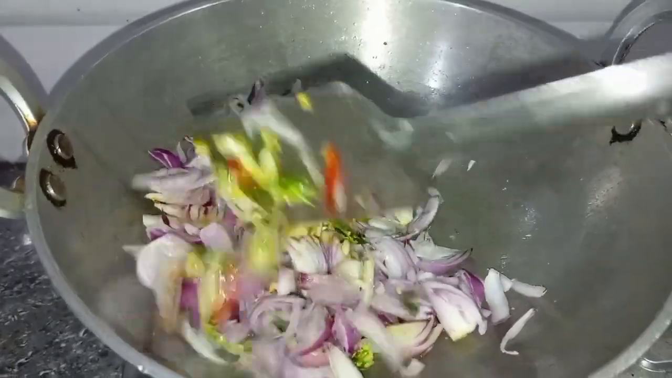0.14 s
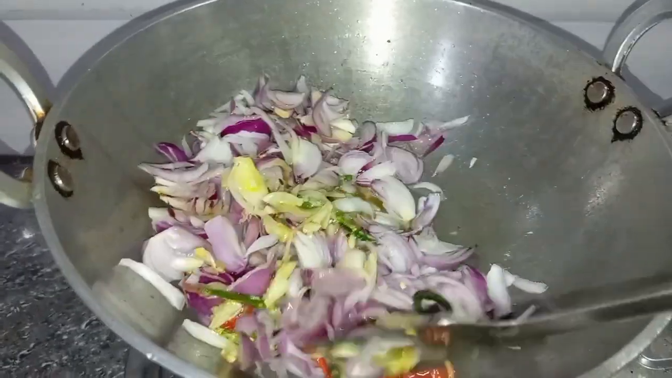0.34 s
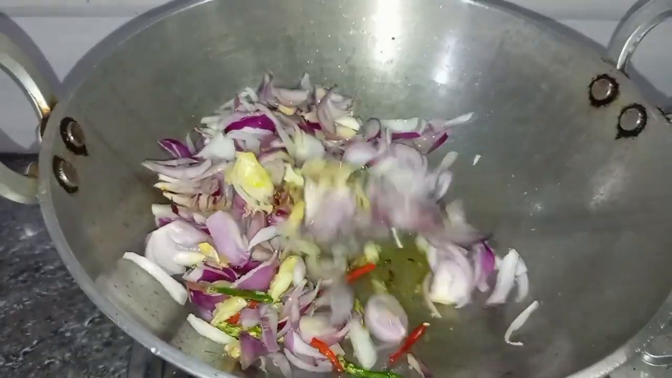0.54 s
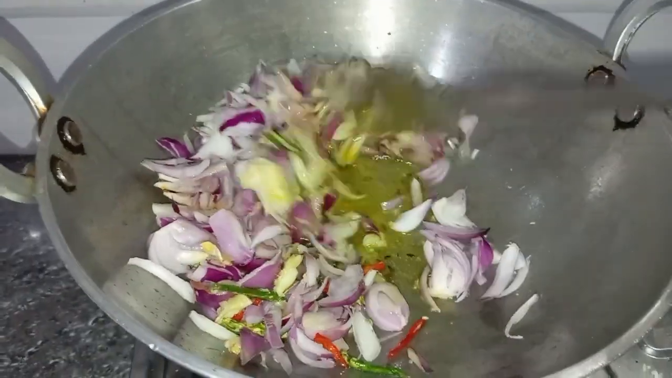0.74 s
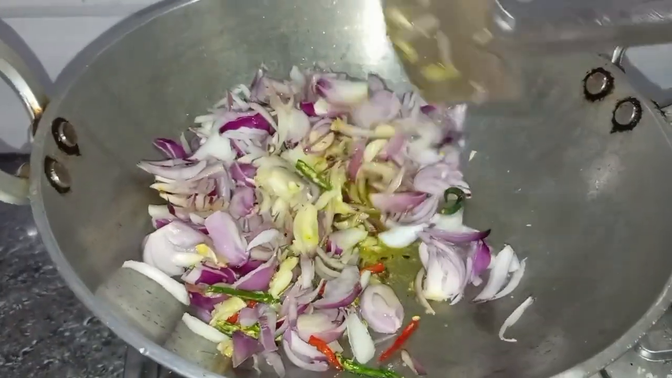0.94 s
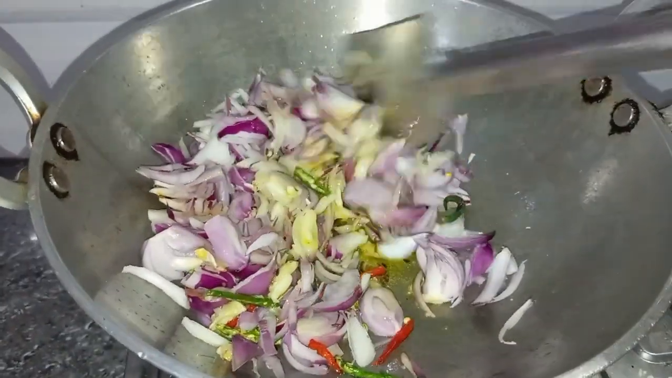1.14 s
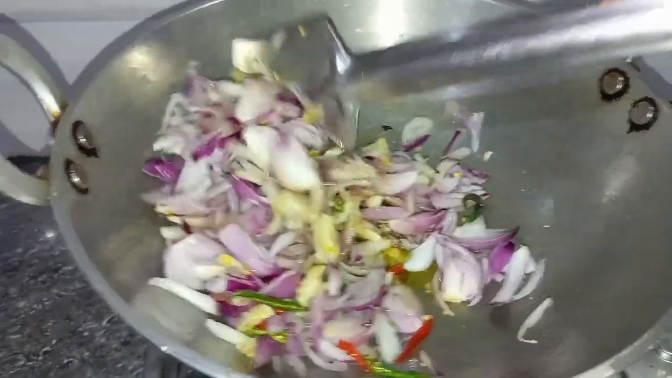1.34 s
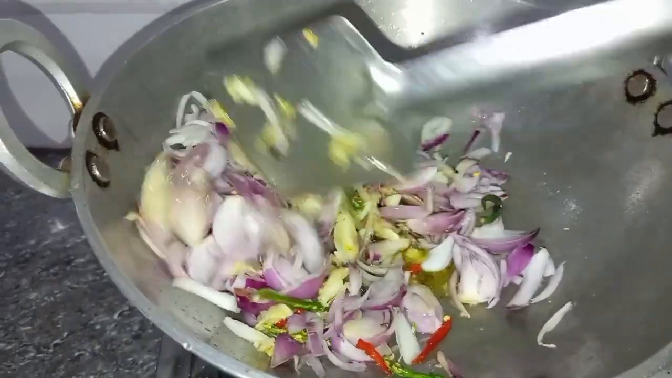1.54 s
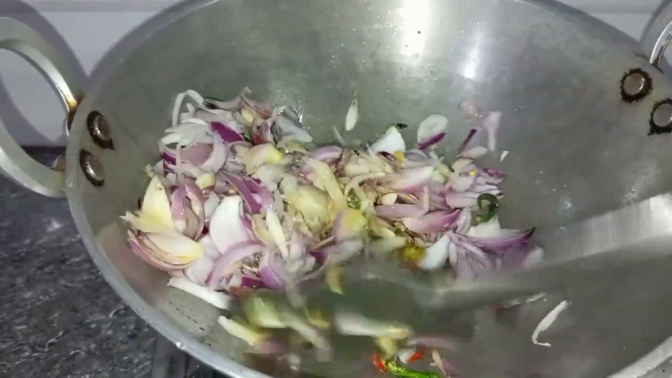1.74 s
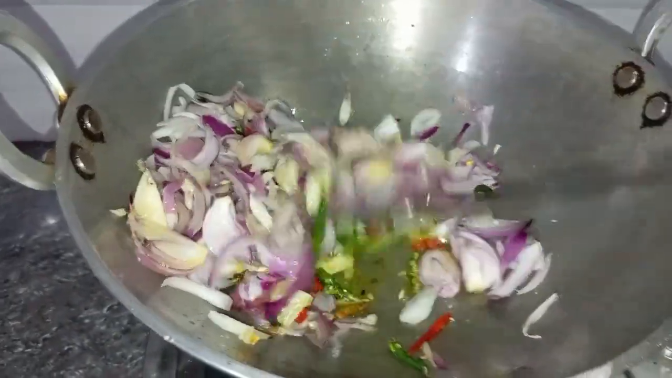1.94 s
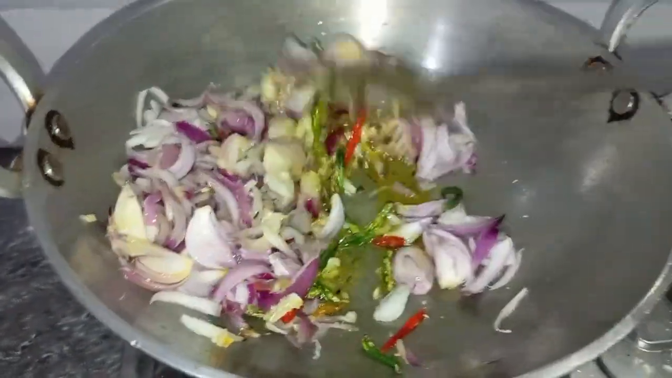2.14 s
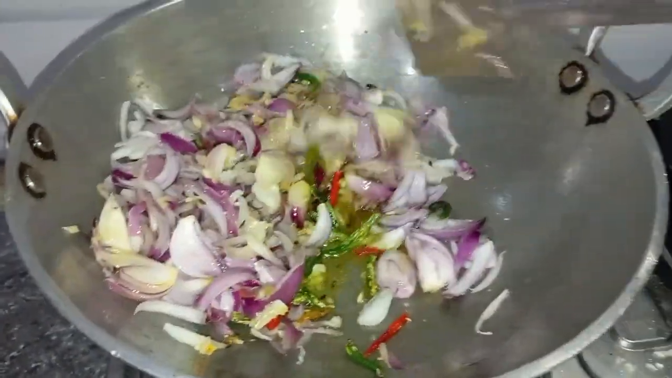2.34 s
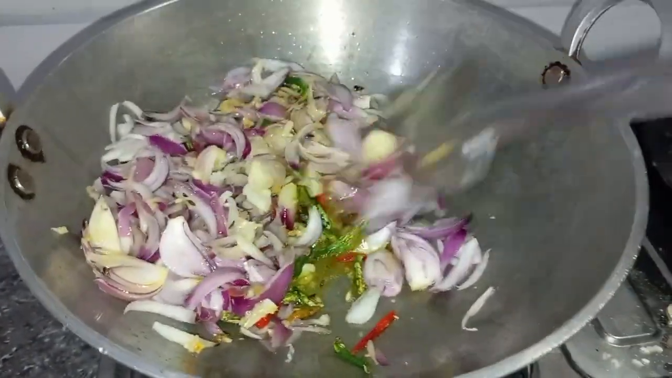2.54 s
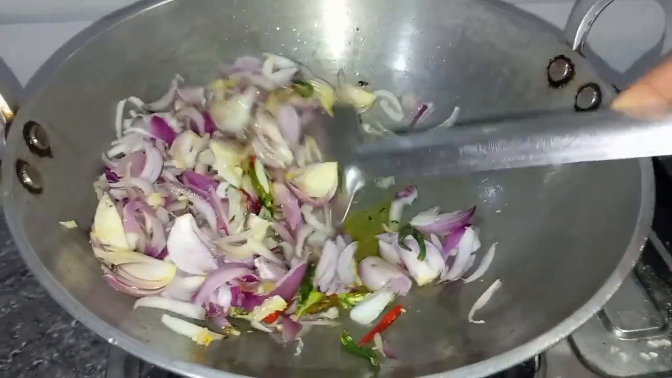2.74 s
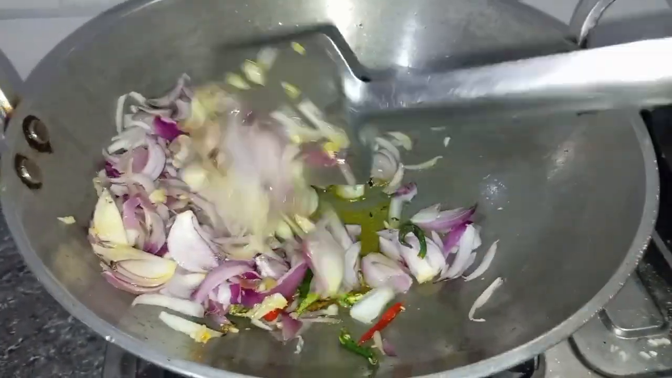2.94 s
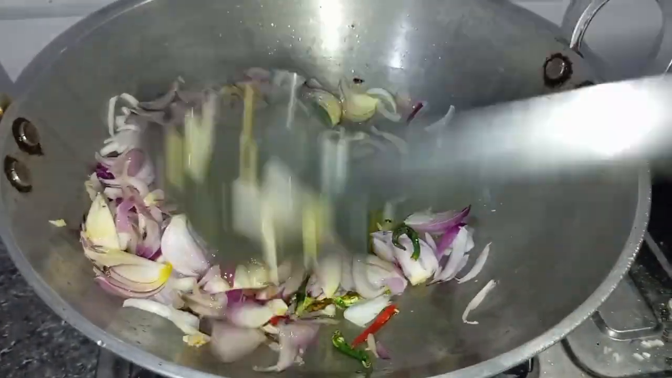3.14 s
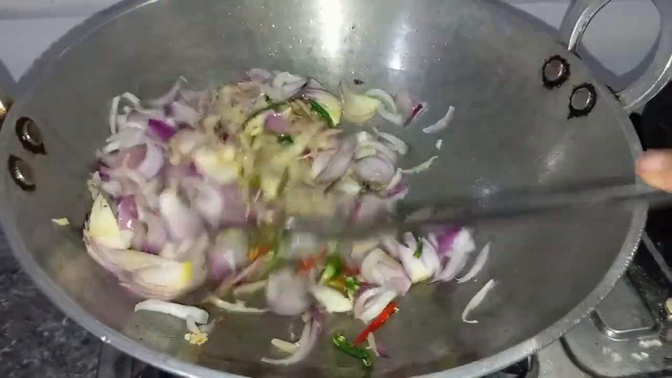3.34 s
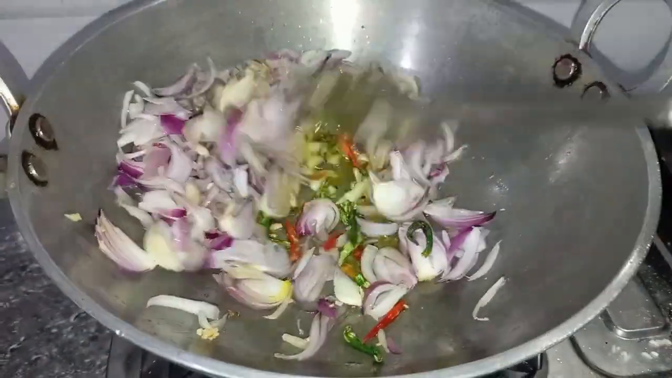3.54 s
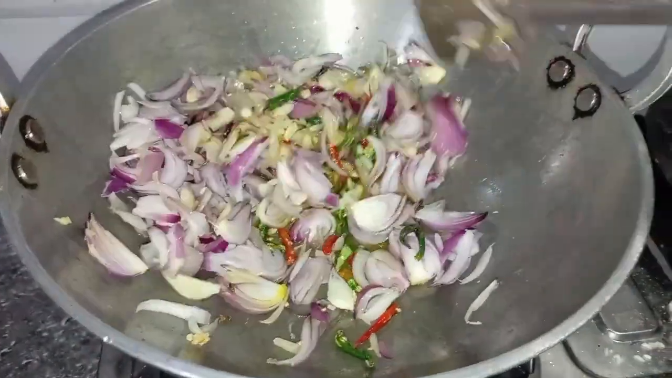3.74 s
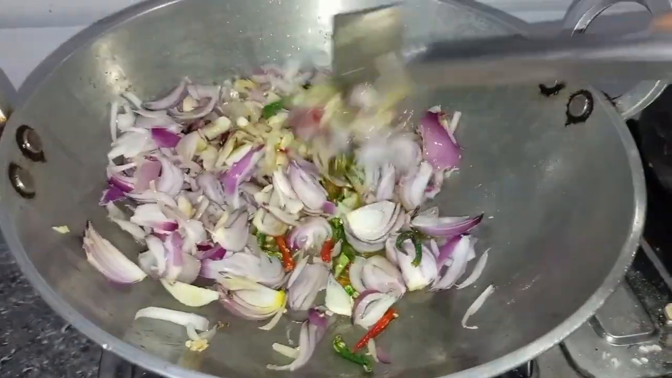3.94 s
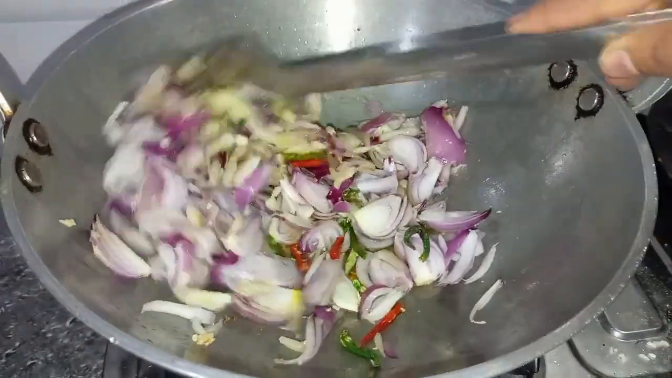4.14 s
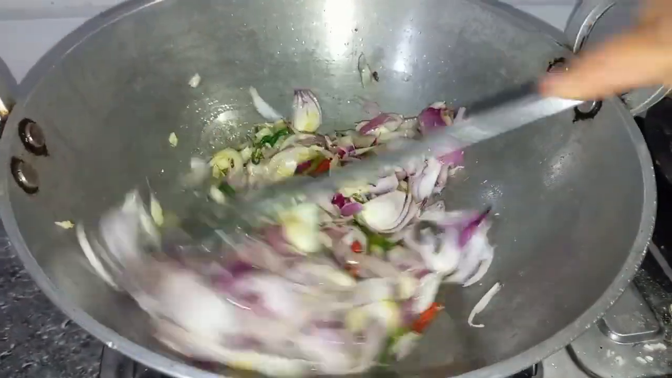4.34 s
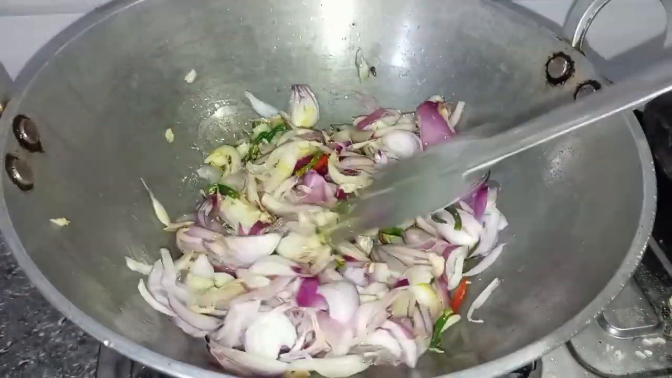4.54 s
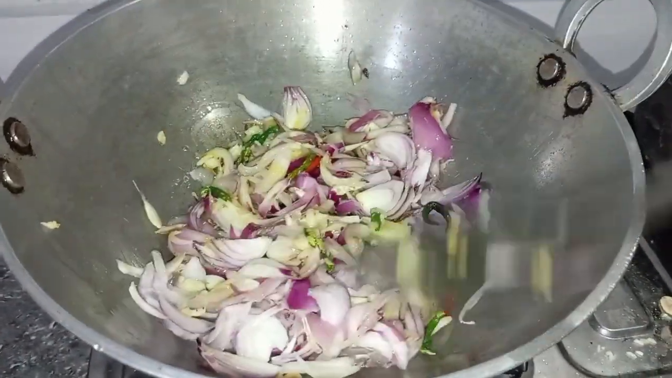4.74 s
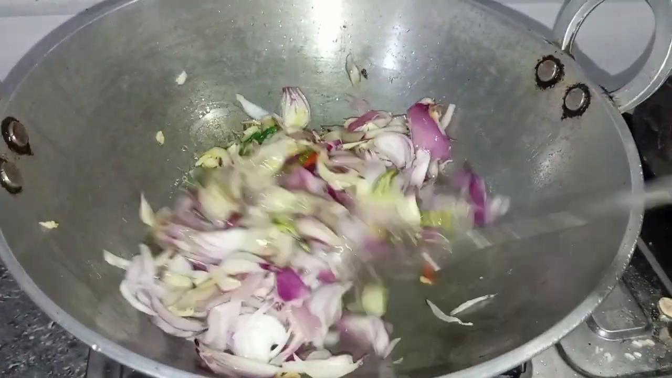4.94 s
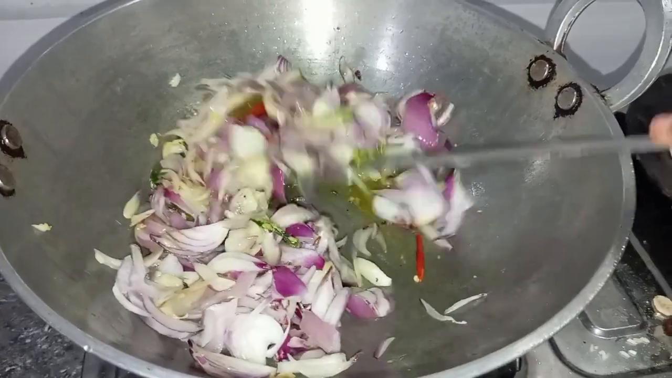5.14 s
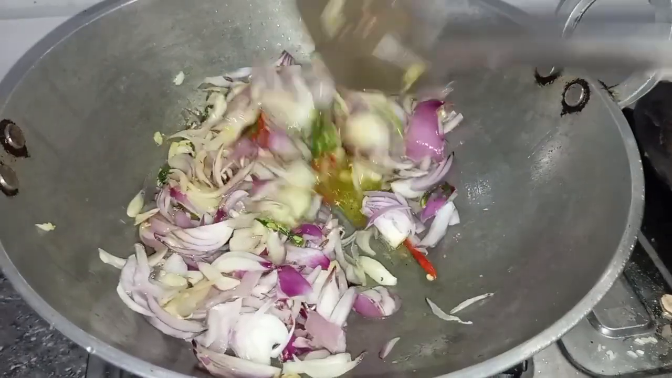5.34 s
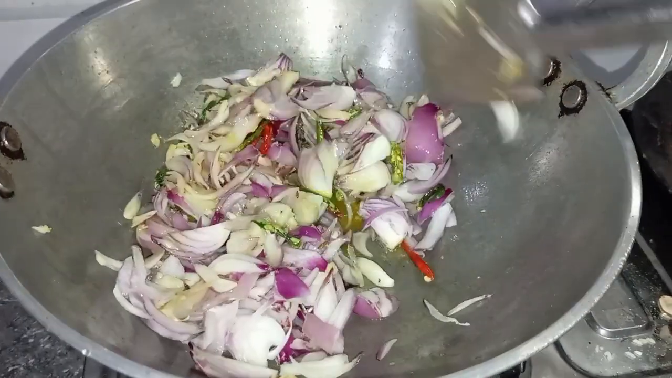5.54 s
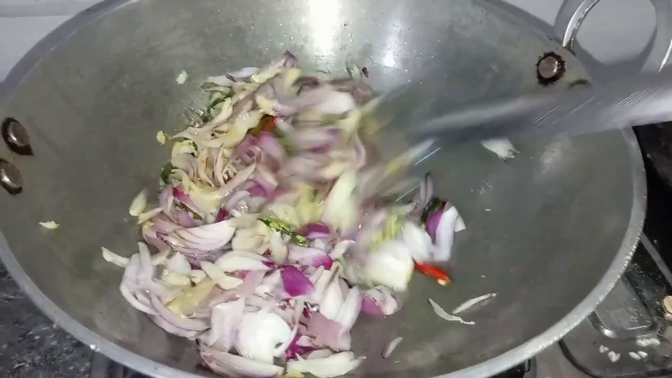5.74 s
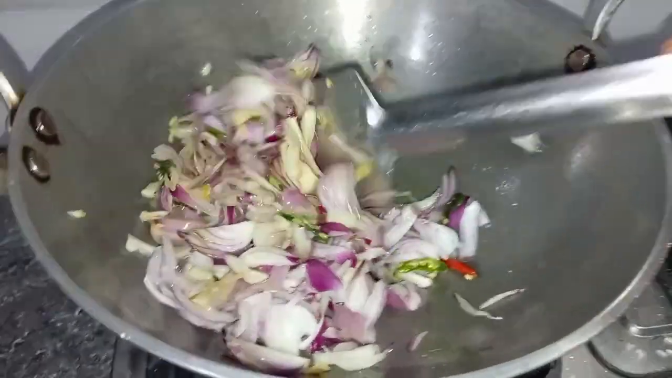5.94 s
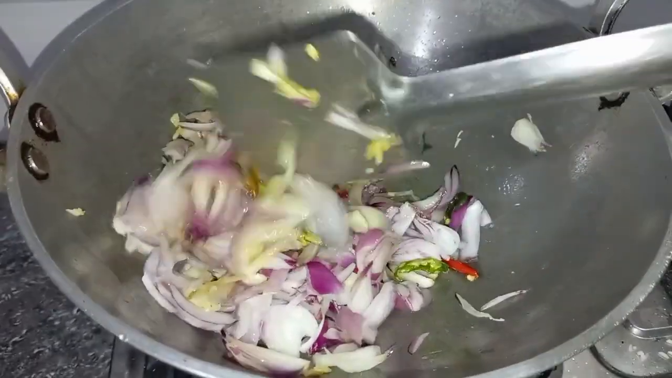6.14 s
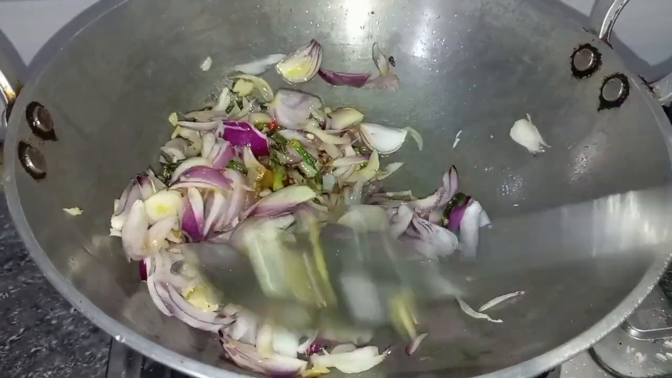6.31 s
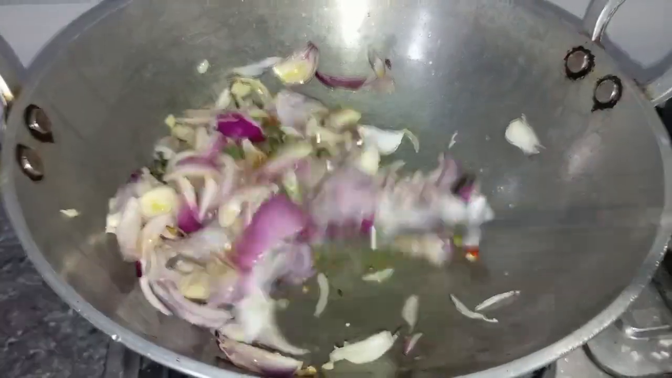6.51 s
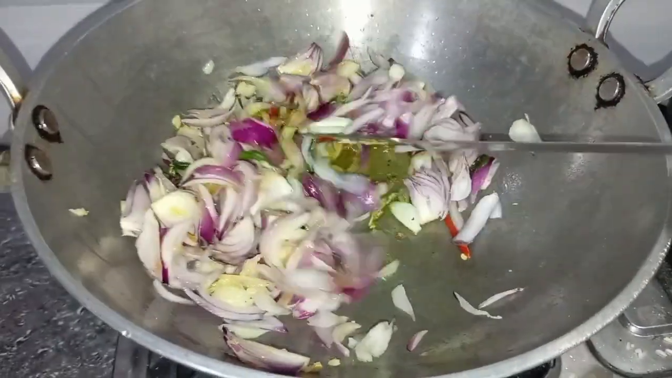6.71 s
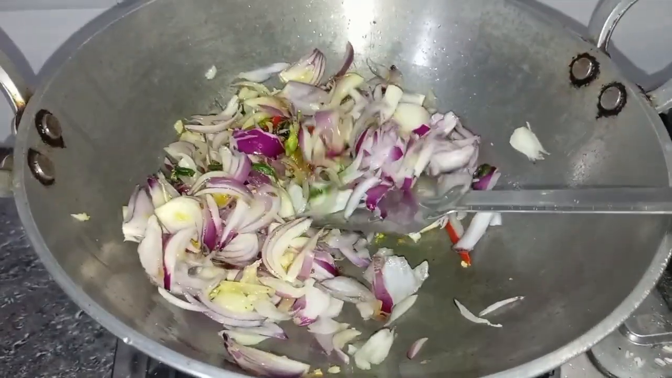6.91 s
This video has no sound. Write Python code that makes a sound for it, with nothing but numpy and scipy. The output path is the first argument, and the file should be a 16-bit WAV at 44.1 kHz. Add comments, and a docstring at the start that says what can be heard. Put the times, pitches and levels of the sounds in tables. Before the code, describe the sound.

Onions sizzle brightly in hot oil while a metal spatula lands in the pan with sharp clanks and gritty scrapes, amid snapping oil pops.

```python
"""Sliced onions sizzle in oil in a deep metal pan, close to a mono microphone in a quiet kitchen.
From the start, water bursts as dense grains of filtered noise, with sparse tinkling; pops are ringing clicks.
After a third of a second a metal spatula makes the first of nine landings, each followed by a scrape:
blows and gritty noise excite shared modes of blade and pan. Short crackles of spiky ringing noise come
from the pan; from two seconds on there are soft low thumps, one longer low hum and three stick-slip squeals."""
import sys
import numpy as np
from scipy import signal
from scipy.fft import rfft, irfft
from scipy.io import wavfile
from scipy.ndimage import uniform_filter1d, minimum_filter1d

SR = 44100
rng = np.random.default_rng(int(sys.argv[2]) if len(sys.argv) > 2 else 0)


def to_wav(sig):
    """Store sig (one row per channel, or 1-D mono) as 16-bit WAV at the path in sys.argv[1].

    Samples outside -1..1 are clipped; the rate is SR.
    """
    pcm = np.clip(np.atleast_2d(sig), -1, 1) * 32767
    pcm = np.round(pcm).astype(np.int16)
    wavfile.write(sys.argv[1], SR, pcm.T)  # frames by channels


def invert_db(level):
    """Linear amplitude ratio for a level in decibels (20 dB per decade), elementwise."""
    return 10 ** (np.asarray(level, dtype=float) / 20)


N = 311919   # samples


def rms_one(x):
    """Normalisation: scales the signal to rms 1."""
    return x / np.sqrt(np.mean(x ** 2) + 1e-20)


def in_time(rows, outside=None):
    """Linear interpolation: joins table rows by straight lines, one array per column after the time."""
    s, *columns = np.transpose(rows)
    t = np.arange(N) / SR
    return np.array([np.interp(t, s, column, left=outside, right=outside) for column in columns])


def colour(x, spectrum, size=4096):
    """Minimum-phase filtering: the folded cepstrum gives a causal filter of this spectrum; rms 1 out."""
    hz, db = np.transpose(spectrum)
    grid = np.maximum(np.arange(size // 2 + 1), 0.1) * SR / size
    log_gain = np.interp(np.log(grid), np.log(hz), db) * np.log(10) / 20
    cepstrum = irfft(log_gain)
    cepstrum[1:size // 2] *= 2
    cepstrum[size // 2 + 1:] = 0
    response = irfft(np.exp(rfft(cepstrum)))
    return rms_one(signal.oaconvolve(x, response)[:N])


def high_pass(x, hz):
    """Fourth-order Butterworth low cut."""
    return signal.sosfilt(signal.butter(4, hz, "high", fs=SR, output="sos"), x)


def drift(rate):
    """Low-passed noise: a random wander of rms 1 through a double pole at rate [Hz], every 40th sample."""
    r = np.exp(-80 * np.pi * rate / SR)
    white = rng.standard_normal(N // 40 + 2002)
    slow = signal.lfilter([1], [1, -2 * r, r * r], white)[2000:]
    return np.interp(np.arange(N) / 40, np.arange(len(slow)), rms_one(slow))


def ring(force, hz, t60):
    """Damped resonator: a unit click starts a cosine of height 1; zeros block the spectrum's two ends."""
    r, w = invert_db(-60 / (t60 * SR)), 2 * np.pi * hz / SR
    return signal.lfilter([0.5, 0, -0.5], [1, -2 * r * np.cos(w), r * r], force + 1e-18)


def grains(per_s, spread_db, clump_db):
    """Poisson-like impulses: random clicks of uneven size and sign, in clumps as their rate wanders."""
    sizes = invert_db(spread_db * np.minimum(rng.exponential(1, N), 6)) * rng.choice([-1, 1], N)
    chance = per_s * invert_db(clump_db * drift(15.0)) / SR
    return sizes * (rng.random(N) < chance)


def dying(at, heights, t60):
    """Exponential decay: jumps at the given samples that die away."""
    envelope = np.zeros(N)
    envelope[at] = heights
    return signal.lfilter([1], [1, -invert_db(-60 / (t60 * SR))], envelope + 1e-18)


def swell(s, length, attack_s, release_s):
    """Exponential growth and decay: rises 30 dB into s, holds for length and falls 30 dB a release."""
    t = np.arange(N) / SR - s
    slopes = np.minimum(t / attack_s, (length - t) / release_s)
    return invert_db(np.maximum(30 * np.minimum(slopes, 0), -200))


def ringing_swells(rows, attack_s, release_s, cycles):
    """Narrow-band noise: each row swells at one pitch, with cycles of ringing per 60 dB of decay."""
    noise = rng.standard_normal((len(rows), N))
    out = 0
    for (s, length, hz, db), white in zip(rows, noise):
        tone = rms_one(ring(white, hz, cycles / hz))
        out = out + invert_db(db) * swell(s, length, attack_s, release_s) * tone
    return out


# spectrum of the room's noise: (frequency [Hz], relative density [dB])
ROOM_SPECTRUM = [(35, -66), (60, -5), (97, -5.5), (260, -7), (410, 2), (526, -7.5), (829, 5.5), (946, -3.5),
                 (1210, 3.5), (2000, -9), (2600, -66), (4400, -120)]


def room():
    """Stationary noise with a slight wander in level: the quiet kitchen's coloured noise floor."""
    level = invert_db(-60.5 + 1.25 * drift(6.3))
    return level * colour(rng.standard_normal(N), ROOM_SPECTRUM)


# spectrum of the low rumble: (frequency [Hz], relative density [dB])
RUMBLE_SPECTRUM = [(26, -53), (48, -50), (72, -8), (105, 4.5), (135, -15), (215, 0.5), (310, -22.5)]
# the pan rocks on its ring: (time [s], length [s], level before the wander [dB])
ROCKS = [(1.027, 0.1, -55), (1.783, 0.085, -54.5), (2.34, 0.24, -50.5), (4.804, 0.11, -54),
         (5.028, 0.049, -57.5), (6.566, 0.035, -62)]


def rumble():
    """Amplitude modulation: a faint low noise swells whenever the pan rocks."""
    level = invert_db(-72.5)
    for s, length, db in ROCKS:
        level = level + invert_db(db) * swell(s, length, attack_s=0.012, release_s=0.034)
    return level * invert_db(0.48 * drift(22.0)) * colour(rng.standard_normal(N), RUMBLE_SPECTRUM)


def tinkle(level_db):
    """Lightly damped resonance: random tinkling of sparse small clinks, each click at one of 24 pitches."""
    clicks = grains(per_s=100, spread_db=4.7, clump_db=4.0)
    dealt = rng.integers(0, 24, N)
    rings = 0
    for k, hz in enumerate(np.geomspace(2300, 7000, 24)):
        rings = rings + ring(clicks * (dealt == k), hz, 120 / hz)   # 120 cycles to fall 60 dB
    return invert_db(level_db - 17.5) * rms_one(rings)


def spit():
    """Sparse impulse noise: scattered droplets burst over a wide band."""
    clicks = grains(per_s=110, spread_db=2.3, clump_db=4.2)
    bright = colour(clicks, FIZZ_SPECTRUM)
    low = colour(clicks, BUBBLING_SPECTRUM)
    top = rms_one(high_pass(clicks, 10500.0))
    return invert_db(-59) * rms_one(bright + 0.29 * low + 0.45 * top)


# frying levels before the wander: (time [s], fine fizz [dB], coarse bubbling [dB])
FRYING_LEVELS = [(0.0, -46, -45.5), (1.02, -43, -47), (1.26, -45.5, -49.5), (1.75, -47, -52.5),
                 (1.95, -45.5, -44.5), (3.21, -44, -47), (3.48, -44, -43.5), (4.19, -42, -47),
                 (4.71, -46.5, -50.5), (4.92, -45, -45.5), (5.61, -43, -46.5), (6.32, -45.5, -48),
                 (6.48, -43.5, -41.5), (7.07, -45, -50)]
# spectrum of the fine bursts: (frequency [Hz], relative density [dB])
FIZZ_SPECTRUM = [(1180, -71), (2000, -23), (3190, 1), (3650, -31), (5010, 10), (5470, 14.5), (6950, 17),
                 (8740, 14), (10400, 10.5), (11200, -1.5), (13400, -25.5), (15300, 5.5), (16100, 19),
                 (16500, -66)]
# spectrum of the coarse bursts: (frequency [Hz], relative density [dB])
BUBBLING_SPECTRUM = [(520, -32), (950, -25), (1550, -1.5), (2400, -1), (3400, 4.5), (4800, 3.5), (7500, -9)]


def frying():
    """Shot noise: tiny steam bubbles burst as bright fizz, larger ones bubble lower in the spectrum."""
    fizz_db, bubbling_db = in_time(FRYING_LEVELS)
    hiss = 0.61 * rng.standard_normal(N)      # bursts too fine to tell apart
    fizz = colour(rms_one(grains(9000.0, 3.4, 1.5)) + hiss, FIZZ_SPECTRUM)
    bubbling = colour(grains(5000, 3.5, 2.2), BUBBLING_SPECTRUM)
    fizz = invert_db(fizz_db + 0.8 * drift(4.0)) * fizz
    bubbling = invert_db(bubbling_db + 1.8 * drift(12)) * bubbling
    return spit() + tinkle(bubbling_db) + fizz + bubbling


# soft low thumps around the pan, and one longer low hum:
#   (time [s], length [s], pitch [Hz], level before the swell [dB rms])
THUMPS = [(2.138, 0.059, 228, -61), (2.323, 0.3, 68.4, -55.5), (2.38, 0.07, 268, -52),
          (3.207, 0.074, 424, -58.5), (3.79, 0.13, 218.4, -59), (5.084, 0.046, 439, -56.5),
          (5.576, 0.05, 198.5, -50)]


def thumps():
    """Low resonance under a gentle swell: soft low thumps around the pan, and one longer low hum."""
    return ringing_swells(THUMPS, attack_s=0.037, release_s=0.03, cycles=47)


# short crackles from the pan, some of them oil pops: (time [s], level [dB], pitch [Hz], t60 [s])
CRACKLES = [(0.676, -27, 2600, 0.039), (1.348, -26.5, 6800, 0.027), (2.278, -20, 2620, 0.085),
            (2.293, -23, 3170, 0.147), (3.1004, -23, 1770, 0.056), (4.379, -27, 1370, 0.2),
            (6.792, -28, 1280, 0.075), (2.026, -19.5, 4560, 0.086), (2.064, -26, 5300, 0.06),
            (3.559, -18, 5900, 0.094), (3.715, -20, 3830, 0.08), (5.873, -24, 5900, 0.13)]


def crackles():
    """Impulsive noise in a damped resonator: spiky noise at one pitch that dies away."""
    t = np.arange(8820) / SR
    out = np.zeros(N + len(t))
    for s, db, hz, t60 in CRACKLES:
        i = round(s * SR)
        crackle = ring(rng.standard_normal(len(t)) ** 3, hz, 4.5 / hz)   # cubing makes the noise spiky
        out[i:i + len(t)] += invert_db(db - 60 * t / t60) * crackle / np.abs(crackle[:600]).max()
    return out[:N]


# single pops in the oil, and two faint ticks just before spatula landings:
#   (time [s], level of the ring [dB], pitch [Hz])
POPS = [(0.037, -14, 6700), (0.0696, -20, 6570), (0.662, -29, 2680), (1.941, -21, 3570),
        (2.133, -25.5, 9500), (2.161, -19.5, 8500), (2.2, -21, 3900), (2.207, -20, 5570),
        (2.254, -28, 2620), (2.2787, -29, 3330), (2.9747, -31, 14500), (3.1025, -29, 1700),
        (3.251, -36.5, 1480), (4.0952, -30.5, 11500), (4.2457, -21.5, 4560), (4.3498, -19, 6660),
        (5.862, -18.5, 6190), (6.0924, -21, 5400), (6.33, -33, 1790), (6.722, -22.5, 5670)]


def pops():
    """Impulse response of a resonator: each click rings a few cycles at a pitch of its own."""
    out, click = np.zeros(N + 400), np.eye(1, 400)[0]
    snap = 0.7 * high_pass(click, 6000.0)      # a bright snap at the onset
    for s, db, hz in POPS:
        i = round(s * SR)
        out[i:i + 400] += invert_db(db) * (ring(click, hz, 12.0 / hz) + snap)
    return out[:N]


# the blade grazes the pan: (time [s], length [s], pitch [Hz], level before the swell [dB rms])
CLINKS = [(0.668, 0.031, 2596, -44.5), (0.765, 0.012, 4090, -45), (0.885, 0.013, 5450, -43),
          (2.03, 0.1, 4000, -50), (2.2, 0.018, 1970, -47), (4.93, 0.042, 3910, -46),
          (6.845, 0.061, 880, -52)]


def clinks():
    """Lightly damped resonance: faint grazes of the blade, each singing on one pitch."""
    return ringing_swells(CLINKS, attack_s=0.0089, release_s=0.0091, cycles=120)


# the blade chatters and squeals: (time [s], length [s], starting pitch [Hz], level before partials [dB])
SQUEALS = [(2.53, 0.14, 1649, -45.5), (5.683, 0.052, 1645, -40), (6.418, 0.163, 1636, -52.5)]
# bending modes of the squealing blade: (multiple of the pitch [ratio], relative level [dB])
SQUEAL_PARTIALS = [(1, 0), (2.1, 5), (3.069, 2.5)]


def squeal():
    """Stick-slip locks onto three bending modes of the blade; each wavers in pitch and strength."""
    release_s, sag_per_s = 0.047, 0.2   # the pitch sags by this share a second
    level, pitch_rows = 0, []
    for s, length, start_hz, db in SQUEALS:
        level = level + invert_db(db) * swell(s, length, 0.028, release_s)
        for after in (0, length + release_s):
            pitch_rows.append((s + after, start_hz * (1 - sag_per_s * after)))
    hz, = in_time(pitch_rows)
    out = 0
    for multiple, db in SQUEAL_PARTIALS:
        phase = 2 * np.pi * np.cumsum(multiple * hz * (1 + 0.003 * drift(30.0))) / SR
        out = out + np.sqrt(2) * invert_db(db + 0.8 * multiple * drift(33.0)) * np.sin(phase)
    return level * out


def soften(envelope):
    """First-order lag: contact builds up over a few milliseconds."""
    contact_s = 0.0056
    r = np.exp(-1 / (contact_s * SR))
    return signal.lfilter([1 - r], [1, -r], envelope)


# spectrum of the bowl's dull knock: (frequency [Hz], relative density [dB])
THUD_SPECTRUM = [(120, -39), (230, 4), (500, 0), (900, 2.5), (1400, -32)]


def thud(rows, at):
    """Heavily damped broad-band response: the whole bowl gives way under a blow with a dull knock."""
    knock = high_pass(colour(rng.standard_normal(N), THUD_SPECTRUM), 170.0)
    return dying(at, 0.35 * invert_db(rows[:, 1]), 0.22) * knock


def crack(rows, at, bounce):
    """Impact noise: the edge meeting the pan gives a brief bright burst at each touch."""
    first = 1.36 * invert_db(rows[:, 4])
    envelope = dying(at, first, 0.075) + dying(bounce, 0.5 * first, 0.017)
    white = rng.standard_normal(N)
    spark = dying(at + 100, 0.9 * first, 0.03) * high_pass(white, 10500.0)      # the very top dies sooner
    return high_pass(soften(envelope) * colour(white, FIZZ_SPECTRUM) + spark, 4400.0)


# free modes of the blade: (frequency [Hz], level over its group's skid [dB], t60 [s])
BLADE_MODES = [(2827, -10, 0.077), (3770, -1, 0.044), (4310, -12, 0.25), (5184, -10.5, 0.16),
               (5700, -14, 0.031), (6970, -9, 0.054), (7380, -7.5, 0.091), (7930, -31, 0.067),
               (8160, -4.5, 0.056), (9330, 1, 0.027), (9680, -5, 0.054)]


def clang(rows, at, bounce):
    """Free vibration: the blade rings clear at each touch; two more modes differ from landing to landing."""
    out = np.zeros(N + 4410)
    strengths_db = 3.4 * rng.standard_normal((len(at), 2, len(BLADE_MODES)))
    for k, (hz, db, t60) in enumerate(BLADE_MODES):
        group = np.searchsorted(GROUP_TOPS_HZ, hz)
        blow_db = rows[:, 1 + group] + db
        force = np.zeros(N)
        force[at + 40] = invert_db(blow_db + strengths_db[:, 0, k])
        force[bounce] = invert_db(blow_db - 6.0 + strengths_db[:, 1, k])
        out[:N] += ring(uniform_filter1d(force, size=3) * 3, hz, t60) * (-1) ** k
    touches = np.zeros(4410)
    touches[[40, bounce[0] - at[0]]] = 1
    # the grip adds a mode of its own at each landing
    for i, db, hz in zip(at, rows[:, 3:5].max(axis=1), rows[:, 5]):
        out[i:i + len(touches)] += invert_db(db + 6.0) * ring(touches, hz, 0.05)
    # the lowest bending mode depends on where the edge lands
    for i, db, stroke in zip(at, rows[:, 2], SCRAPES):
        out[i:i + len(touches)] += invert_db(db + 8.0) * ring(touches, stroke[0][3], 0.042)
    return out[:N]


def contact_shares(at):
    """Modal coupling: the moving contact favours one mode, then another; a group's powers sum to 1."""
    hz, db, t60 = np.transpose(METAL_MODES)[:, :, None]
    group = np.searchsorted(GROUP_TOPS_HZ, hz[:, 0])
    last_landing = np.maximum(np.searchsorted(at, np.arange(N), "right") - 1, 0)
    landed_hz, later_hz, first_boom_hz = np.array(LANDINGS)[last_landing, 5:].T

    # the contact soon slides to another high mode, and gradually to a later boom mode
    fresh = np.minimum(dying(at, 0.82, 0.031 * np.log(1000)), 1)   # time constant 0.031 s
    tink_hz = np.where(fresh > 0.37, landed_hz, later_hz)
    later_boom_hz = 531
    boom_fresh = np.minimum(dying(at, 0.97, 0.14 * np.log(1000)), 1)   # time constant 0.14 s
    boom_hz = later_boom_hz + (first_boom_hz - later_boom_hz) * boom_fresh

    favoured_rows = [(s, *stroke[0][3:]) for s, stroke in zip(at / SR, SCRAPES)]
    favoured_rows += [(row[0], *row[3:]) for stroke in SCRAPES for row in stroke]
    clank_hz, ring_hz = in_time(sorted(favoured_rows))

    favoured_hz = np.array([boom_hz, clank_hz, ring_hz, tink_hz])[:, ::40]
    width = np.where(group > 0, 0.052, 0.12)[:, None]   # in log frequency
    near = np.exp(-(np.log(favoured_hz[group] / hz) / width) ** 2)
    near = near * np.array([0.51, 0.95, 0.8, 0.45])[group, None]
    wander_db = 3.3 * np.array([drift(8)[::40] for mode in METAL_MODES])
    shares = invert_db(db + 22.6 * near + wander_db)
    power = np.array([np.sum(shares[group == g] ** 2, axis=0) for g in group])
    return group, shares / np.sqrt(power)


# pan and blade in contact: (frequency [Hz], relative level [dB], t60 [s])
METAL_MODES = [(306, -10.5, 0.048), (419.3, 0.5, 0.14), (514, -6, 0.1), (568, -3, 0.097), (630, -5, 0.045),
               (708, -22, 0.015), (802, -14.5, 0.16), (857, -6, 0.025), (1000, -3.5, 0.093),
               (1176, -5, 0.057), (1374, -4, 0.023), (1624, -5, 0.092), (1946, -7.5, 0.11),
               (2500, 4.5, 0.086), (2668, 7.5, 0.045), (2960, 0, 0.11), (3370, -0.5, 0.12),
               (3480, -3.5, 0.13), (3813, 4, 0.028), (4060, -8, 0.11), (4690, 1, 0.05), (5030, 6.5, 0.073),
               (5450, 5, 0.089), (5900, 9.5, 0.09), (5620, 7, 0.016), (6400, 13, 0.08), (7300, 5.5, 0.2),
               (8800, 4, 0.013), (9760, 4, 0.019)]


def contact_modes(rows, at, bounce, scrape, grit):
    """Modal synthesis: blows and gritty scraping force a bank of damped resonators."""
    starts = np.arange(at[0] - 200, N + 1200, 1200)      # short stretches, each with its own tuning
    stroke_of = np.searchsorted(at, np.minimum(starts + 1199, N), "right") - 1
    out = np.zeros(N + SR)
    for k, ((hz, db, t60), group, share) in enumerate(zip(METAL_MODES, *contact_shares(at))):
        share = np.repeat(share, 40)[:N]
        # 3 dB over the skid; only the two low groups take the blow itself
        blow = invert_db(rows[:, 1 + group] + 3) * (group <= 1)
        force = np.zeros(N)
        force[at] = blow * share[at + 300]
        force[bounce] = blow * share[bounce] * invert_db(-5.0)
        steady = np.sqrt(4 * np.log(1000) / (t60 * SR))      # rms 1 noise rings at rms 1
        force += scrape[group] * grit[group] * steady * share
        # food load and grip shift the modes stroke by stroke, and they wander as the blade travels
        detune = 1 + 0.006 * rng.standard_normal(len(at))[stroke_of]
        detune = detune + 0.013 * drift(4.0)[np.minimum(starts, N - 1)]
        for start, end, shift in zip(starts, starts[1:], detune):
            stretch = np.pad(force[start:end], (0, SR // 12))   # room for the ring to die
            out[start:start + len(stretch)] += ring(stretch, hz * shift, t60) * (-1) ** k
    return high_pass(out[:N], 164.0)


# spatula landings: (time [s], skid level of boom [dB], clank [dB], ring [dB], tink [dB] modes,
#   high mode favoured at the touch [Hz], high mode favoured later [Hz], boom mode favoured at the touch [Hz])
LANDINGS = [(0.332, -50, -46, -27.5, -29, 5070, 5140, 400),
            (0.999, -19.5, -49, -33.5, -29.5, 5450, 4600, 445),
            (1.729, -38.5, -33.5, -27.5, -25.5, 5180, 5000, 430),
            (2.422, -33, -44, -39, -26, 8000, 5020, 423), (3.265, -33.5, -37, -34.5, -50, 3840, 5000, 507),
            (3.754, -45, -48, -45, -32, 5700, 6400, 440), (4.752, -44, -39.5, -36.5, -31, 8800, 5140, 407),
            (5.537, -32, -45.5, -40, -28.5, 8580, 4950, 418),
            (6.337, -52, -41, -33.5, -30.5, 5100, 5200, 404)]
# scrapes, one curve a stroke: (time [s], low modes [dB], high modes [dB],
#   favoured clank mode [Hz], favoured ring mode [Hz])
SCRAPES = [
    [(0.345, -38, -55, 1410, 3060), (0.369, -48.5, -47, 1640, 3000), (0.471, -46.5, -45.5, 1170, 3640),
     (0.573, -47.5, -43, 1110, 3330), (0.627, -54, -49, 1110, 3310), (0.675, -73.5, -53, 1500, 2680)],
    [(1.015, -52, -29.5, 1327, 3300), (1.101, -36.5, -43, 1314, 3210), (1.127, -31.5, -43.5, 1650, 3330),
     (1.177, -35, -40.5, 1130, 2430), (1.269, -46.5, -54.5, 1120, 3050), (1.377, -59, -83, 1370, 3420)],
    [(1.745, -39, -58, 1513, 3600), (1.781, -54, -34, 1530, 3690), (1.833, -40.5, -31, 1604, 3700),
     (1.991, -54.5, -47.5, 1430, 3480), (2.067, -83, -44, 1670, 3760), (2.311, -60, -45, 1370, 3320)],
    [(2.44, -42, -40, 1340, 3360), (2.48, -46, -36, 1630, 3470), (2.54, -41, -23, 1624, 3480),
     (2.556, -41, -26.5, 1620, 3300), (2.632, -43, -33, 1584, 3350), (2.734, -69, -45.5, 1570, 3000)],
    [(3.28, -54, -48, 1040, 3800), (3.296, -60, -65, 1120, 3830), (3.33, -42, -41, 1000, 3760),
     (3.362, -44.5, -40, 1000, 3560), (3.426, -51, -48, 1400, 3200), (3.462, -69, -50, 1410, 2700)],
    [(3.77, -33.5, -66, 1580, 3350), (3.79, -46, -54, 1620, 3460), (3.928, -51.5, -45, 1630, 3200),
     (3.99, -32, -53, 960, 3040), (4.054, -31, -53.5, 1080, 2990), (4.14, -49, -44.5, 1215, 3000)],
    [(4.765, -43, -47, 1380, 3710), (4.875, -46.5, -54, 1720, 3560), (4.935, -59, -49.5, 1116, 3530),
     (5.067, -67, -41.5, 1230, 3480), (5.131, -77, -62, 1470, 3270), (5.15, -81, -45, 1570, 3250)],
    [(5.555, -37, -58, 1400, 3590), (5.615, -46, -49, 1366, 3480), (5.647, -46, -53, 1608, 3370),
     (5.701, -46.5, -32.5, 1633, 3400), (5.789, -47.5, -53, 1610, 3320), (5.893, -60, -56, 1370, 3550)],
    [(6.35, -46, -74, 1457, 3620), (6.432, -48, -38, 1570, 3500), (6.56, -46, -40, 1536, 3600),
     (6.66, -51, -41.5, 1170, 2420), (6.748, -52, -78, 1380, 3500), (6.854, -47.5, -41, 1340, 3850),
     (6.902, -55, -73, 1185, 3060), (6.97, -86, -52, 1630, 3330)],
]
# upper edges of the boom, clank and ring groups; tink lies above: (frequency [Hz])
GROUP_TOPS_HZ = [900, 2250, 4500]
# how each group follows the two scrape levels: (share of the low level [ratio], offset [dB])
GROUP_FOLLOWS = [(1, 0.5), (0.28, -3.5), (0.018, -2), (0.094, -0.5)]


def metal():
    """Forced vibration: landings and scraping drive the same modes of pan and blade."""
    rows = np.array(LANDINGS)
    at = np.round(rows[:, 0] * SR).astype(int)
    bounce = at + round(0.011 * SR)      # the blade springs back and lands again
    levels = [in_time(np.array(stroke)[:, :3], outside=-120) for stroke in SCRAPES]
    low_db, high_db = np.max(levels, axis=0)
    scrape = []
    for g, (low, db) in enumerate(GROUP_FOLLOWS):
        skid = soften(dying(at, invert_db(rows[:, 1 + g]), 0.17))   # the edge skids briefly after the blow
        scrape.append(invert_db(db + low * low_db + (1 - low) * high_db) + skid)
    grit = [rms_one(grains(4000.0, 3.72, clump_db)) for clump_db in (0.73, 3.0, 2.5, 1.5)]
    modes = contact_modes(rows, at, bounce, scrape, grit)
    rasp = 0.35 * scrape[3] * colour(grit[3], FIZZ_SPECTRUM)      # modes too dense to tell apart
    rasp = rasp + 0.31 * scrape[2] * colour(grit[2], BUBBLING_SPECTRUM)
    rasp = rasp + 0.097 * scrape[0] * high_pass(colour(grit[0], THUD_SPECTRUM), 800.0)
    return modes + rasp + crack(rows, at, bounce) + clang(rows, at, bounce) + thud(rows, at)


def scene():
    """Superposition: the pressures of all sources add at one microphone."""
    background = room() + rumble() + frying()
    single_sounds = thumps() + high_pass(pops() + crackles(), 604.0)
    spatula = clinks() + squeal() + metal()
    mono = background + single_sounds + spatula
    return np.array([mono, mono])


def limiter(x, threshold_db=-22.0, slope=0.24, ahead_s=0.021):
    """Look-ahead gain control: the gain sinks just before a loud peak and comes back after it."""
    span = round(ahead_s * SR)
    over_db = np.maximum(20 * np.log10(np.abs(x[0]) + 1e-9) - threshold_db, 0)
    gain_db = minimum_filter1d(-slope * over_db, 2 * span + 1)
    return x * invert_db(uniform_filter1d(gain_db, span // 4))


def band_limit(x):
    """A steep low-pass at the top of the band."""
    return signal.sosfilt(signal.butter(12, 16960, fs=SR, output="sos"), x)


def record(dry):
    """Dynamic compression and band-limiting: peaks are limited and the top above 16 kHz is cut."""
    top_cut = signal.cheby2(14, 40, 16000, fs=SR, output="sos")
    mix = signal.sosfilt(top_cut, limiter(dry))
    return band_limit(mix)


dry = scene()
out = record(dry)
to_wav(out)
```